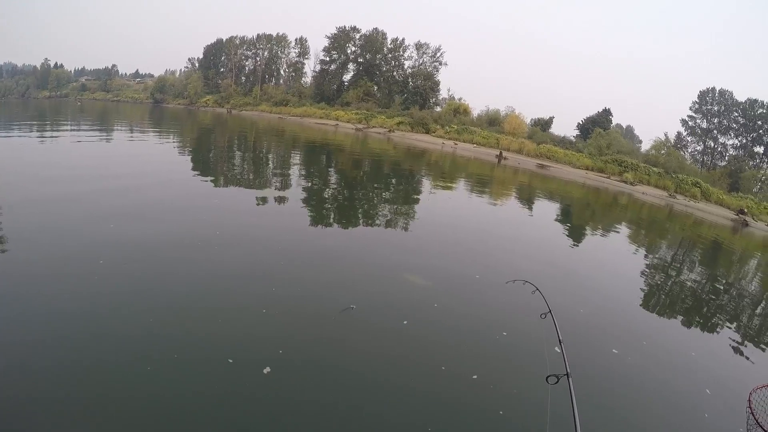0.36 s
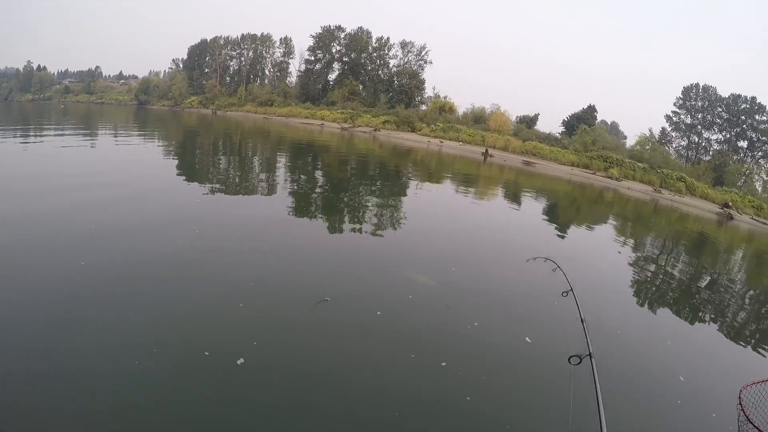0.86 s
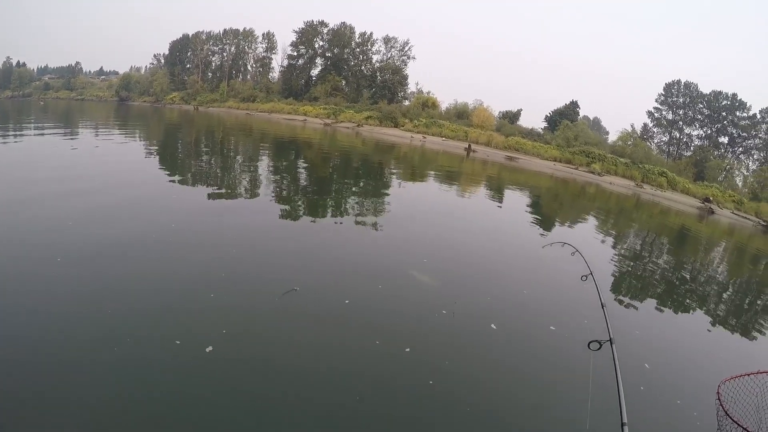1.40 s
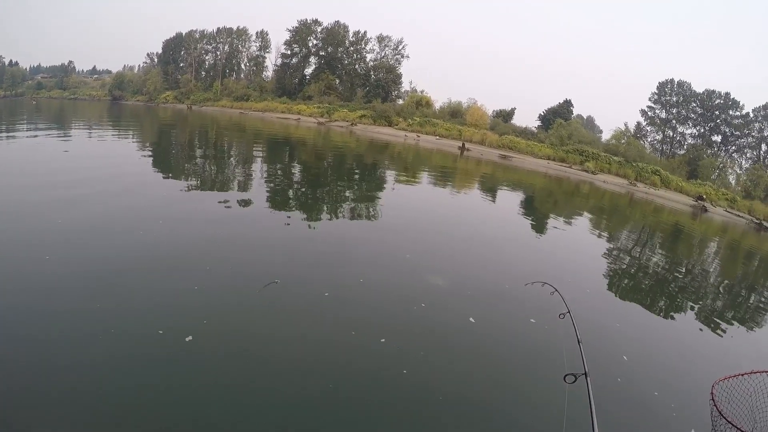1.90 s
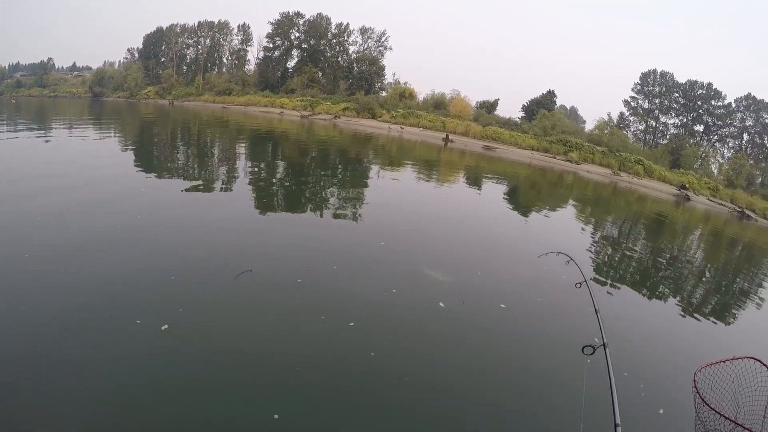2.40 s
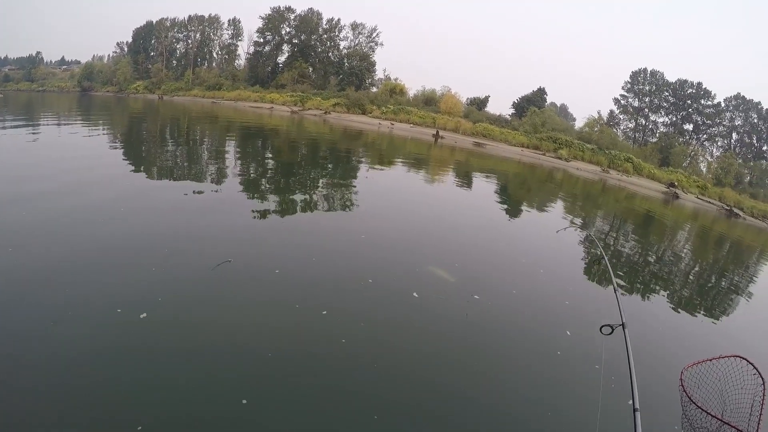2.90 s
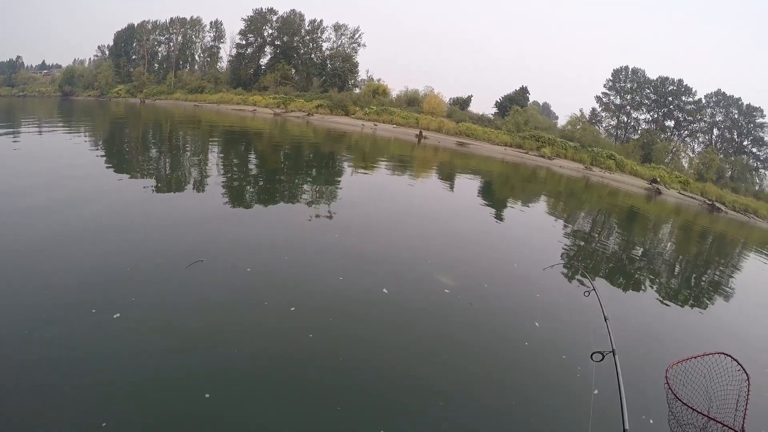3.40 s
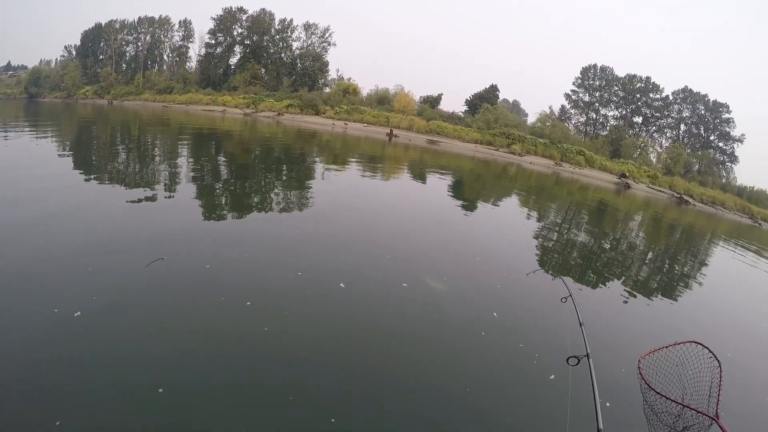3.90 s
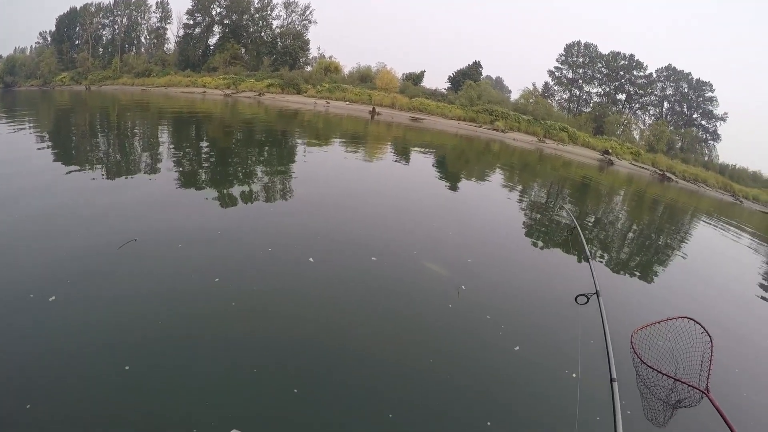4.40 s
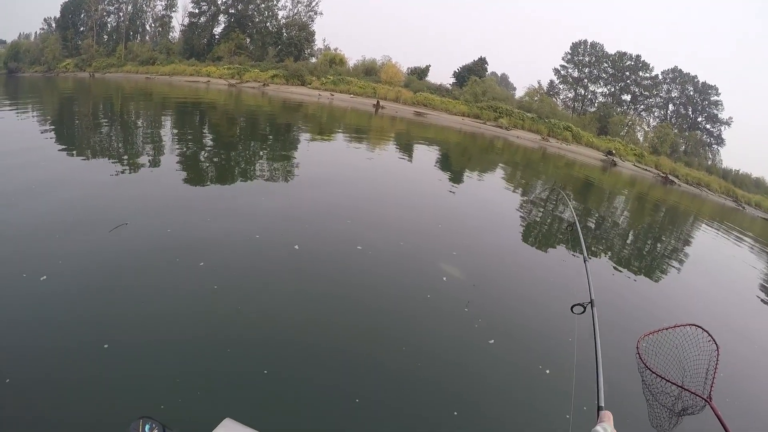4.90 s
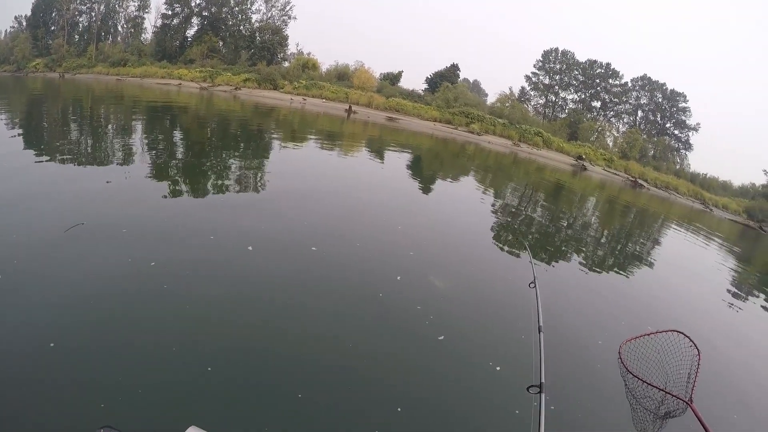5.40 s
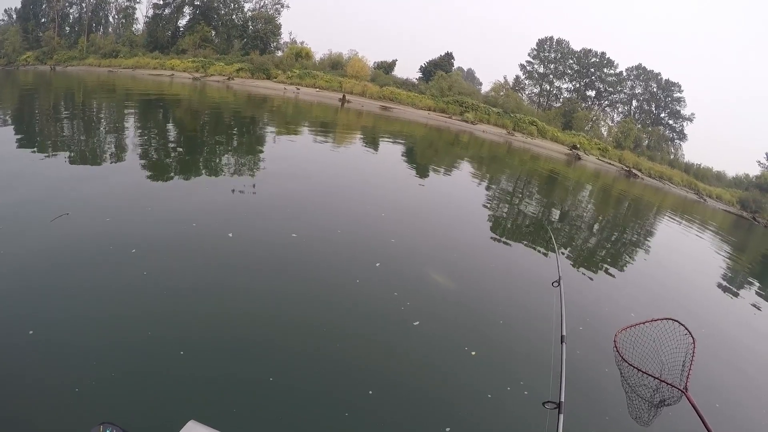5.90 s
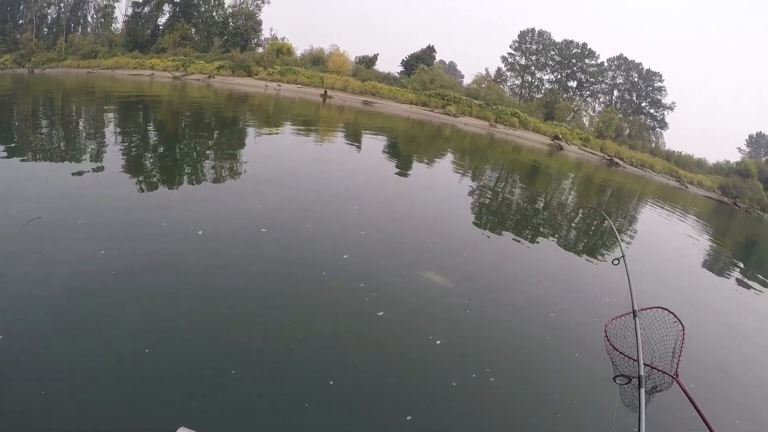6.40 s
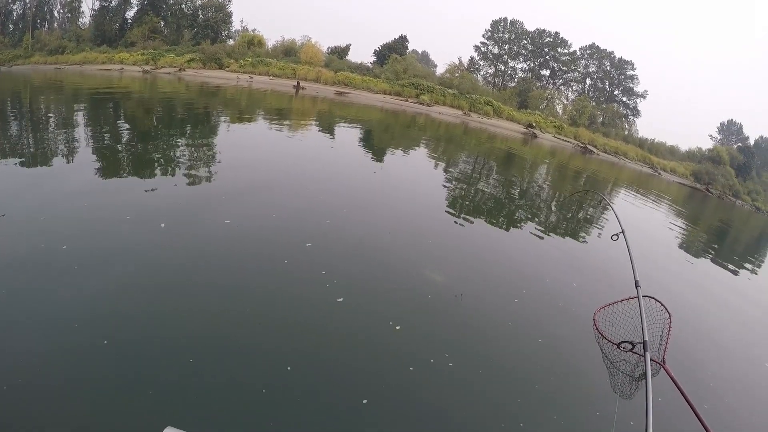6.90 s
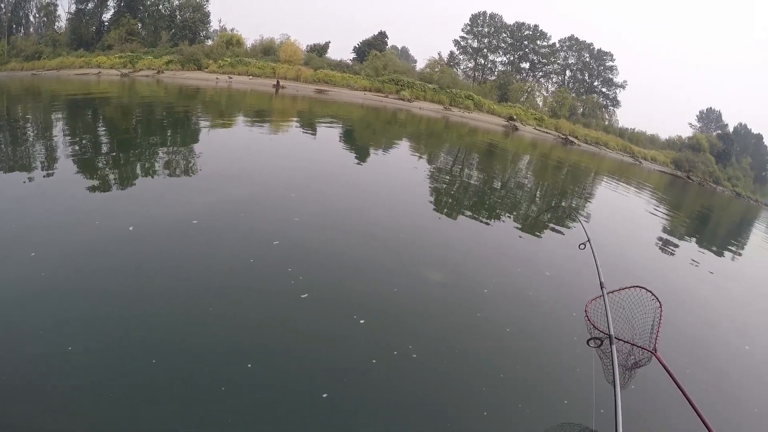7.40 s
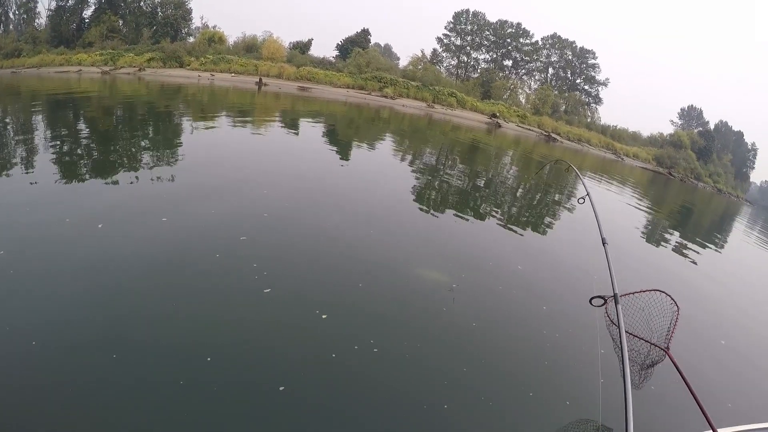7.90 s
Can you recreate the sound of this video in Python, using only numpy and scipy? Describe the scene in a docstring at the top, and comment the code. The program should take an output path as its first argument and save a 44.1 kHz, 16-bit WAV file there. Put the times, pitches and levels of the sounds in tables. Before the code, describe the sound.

A microphone in a small boat picks up a continuous deep motor drone, buzzing softly and drooping gradually in pitch. Low wind noise flutters around it and grows into heavy, irregular thumps after about four and a half seconds. Quiet water hiss, barely audible rustles and low washes fill the background. Very faint high chirps dot the opening and return later; occasional dry ticks and a short clink appear among the gusts.

```python
"""Motor drone over a calm river

A piston motor drones past, sinking in pitch: wavering multiples of the firing rate plus a rush of exhaust gas.
A microphone in a small boat hears it straight and, late and duller, off the water.
Wind noise rumbles, thumps and buffets in growing gusts; faint rustles, low washes and ticks are shaped noise,
a clink is ringing modes. An insect chirps in sine pips over a soft noise hiss and two thin electronic whines."""
import sys
import numpy as np
from scipy import signal
from scipy.fft import rfft, irfft, next_fast_len
from scipy.io import wavfile
from scipy.ndimage import uniform_filter1d

SR = 44100
rng = np.random.default_rng(int(sys.argv[2]) if len(sys.argv) > 2 else 0)


def to_linear_factor(level_db):
    """Convert decibel levels (scalar or array-like) to linear amplitude factors."""
    exponent = np.asarray(level_db, float) / 20
    return 10 ** exponent


def dump(signal):
    """Clip the signal to [-1, 1] and save it as 16-bit WAV at the path in sys.argv[1]."""
    limited = np.clip(np.atleast_2d(signal).T, -1, 1)
    pcm = np.round(limited * 32767).astype(np.int16)
    wavfile.write(sys.argv[1], SR, pcm)


N = 354563
T = np.arange(N) / SR


def level(x, db):
    """Scale to an rms level."""
    return x * to_linear_factor(db) / np.sqrt(np.mean(x ** 2))


def columns(table):
    """Each column after the time column, interpolated sample by sample."""
    s, *rest = np.transpose(table)
    return [np.interp(T, s, c) for c in rest]


def walk(rate_hz):
    """Random levels held 1 / rate_hz and slewed twice; spread near 1."""
    hold = int(SR / rate_hz)
    steps = np.repeat(rng.standard_normal(N // hold + 1), hold)
    return 1.213 * uniform_filter1d(uniform_filter1d(steps, hold), hold)[:N]


def coloured(spectrum):
    """Noise of rms 1 with the given spectrum, joined on a log frequency axis."""
    hz, db = np.transpose(spectrum)
    size = next_fast_len(N)
    f = np.arange(size // 2 + 1) * SR / size + 1  # + 1 keeps the log finite
    gain = to_linear_factor(np.interp(np.log(f), np.log(hz), db, left=-80, right=-80))
    return level(irfft(rfft(rng.standard_normal(size)) * gain, size)[:N], 0)


def band(x, hz, width_hz):
    """Resonant band-pass, gain 1 at the centre."""
    return signal.lfilter(*signal.iirpeak(hz, hz / width_hz, fs=SR), x)


def add(out, s, sound):
    """Mix a short sound in at a time."""
    i = int(s * SR)
    out[i:i + len(sound)] += sound[:N - i]


def swells(table):
    """Summed power of bell-shaped swells; a length spans the 1/e power points."""
    return sum(to_linear_factor(2 * db) * np.exp(-(2 * (T - s) / length_s) ** 2) for s, db, length_s in table)


def motor(firing_hz, second_tone_db, upper_db):
    """Even firings give tones that waver in the moving air, the high ones most; gas puffs once a firing."""
    # Exhaust tones, first to twentieth multiple of the firing rate: relative peak level in dB.
    tones_db = [-5, 3.5, -5, -11.5, -10, -12.5, -23, -21, -23.5, -25, -35, -44, -44, -35.5, -47, -51, -41.5,
                -38, -44, -41]
    # Rush of exhaust gas. Each row: frequency in Hz, relative density in dB.
    gas_spectrum = [(60, -9), (120, -9), (250, -1), (330, 0), (430, -5.5), (620, -14.5), (750, -20),
                    (1000, -30.5), (1600, -34), (3000, -34)]
    gas_db, gas_follows = -10, 0.1  # gas_follows: dB of gas per dB of upper_db
    phase = 2 * np.pi * np.cumsum(firing_hz * (1 + .001 * walk(9))) / SR
    tones = 0
    for k, db in enumerate(tones_db, start=1):
        waver_db = min(.5 + .025 * k * k, 3.2) * walk(6)
        slip_rad = .006 * k * k * walk(7)
        lift_db = second_tone_db * (k == 2) + upper_db * (k >= 7)
        tones = tones + to_linear_factor(db + lift_db + waver_db) * np.cos(k * phase + slip_rad)
    gas = (1 + 0.023 * np.cos(phase)) * coloured(gas_spectrum)
    return tones + to_linear_factor(gas_follows * upper_db) * level(gas, gas_db)


def off_water(x, lag_ms):
    """The bounce is late, duller and turned in phase, so dark bands slide down as the lag grows."""
    share, turn_rad, top_hz = 0.56, 0.9, 1800  # -6 dB at top_hz
    size = next_fast_len(2 * N)
    f = np.arange(size // 2 + 1) * SR / size
    mirrored = np.r_[x, x[::-1]]  # no jump at the ends
    response = np.exp(-1j * turn_rad) / (1 + (f / top_hz) ** 2)
    turned = irfft(rfft(mirrored, size) * response, size)[:N]
    return share * np.interp(T - lag_ms / 1000, T, turned)


def wind_rumble(wind_db):
    """Slow eddies on the microphone, one after another at about the strength of the wind."""
    # Each row: frequency in Hz, relative density in dB before the eddies are evened out.
    rumble_spectrum = [(7.1, -33), (12, 5.5), (27, 1.5), (40, 2.5), (65, 3), (82, -4), (100, -10.5),
                       (130, -20), (170, -43), (290, -120)]
    eddies = coloured(rumble_spectrum)
    power = uniform_filter1d(uniform_filter1d(eddies ** 2, size=2500), size=2500)
    evened = level(eddies / (power + 0.041) ** 0.37, 0)
    return to_linear_factor(wind_db + 2 * walk(16)) * evened  # small eddies come and go by chance


def wind_thumps():
    """Strong eddies swing the membrane a few times; long thumps are deeper."""
    # Each row: centre in seconds, level in dB, length in seconds.
    thump_rows = [(1.008, -34.5, 0.042), (1.157, -39, 0.03), (1.589, -36, 0.052), (1.859, -41, 0.095),
                  (2.449, -37.5, 0.096), (3.549, -42, 0.033), (4.102, -39, 0.048), (4.293, -36, 0.056),
                  (4.629, -30.5, 0.059), (4.812, -26, 0.055), (4.885, -28.5, 0.059), (5.222, -30.5, 0.079),
                  (5.398, -36, 0.045), (5.549, -34, 0.044), (5.665, -34, 0.054), (6.003, -30.5, 0.048),
                  (6.146, -31.5, 0.07), (6.549, -34.5, 0.052), (6.834, -32, 0.044), (7.21, -27, 0.058),
                  (7.319, -37.5, 0.068), (7.428, -23, 0.049), (7.549, -31.5, 0.077), (7.716, -32, 0.082),
                  (7.957, -31.5, 0.053)]
    cycles_per_length = 2.19
    thumps = np.zeros(N)
    for row in thump_rows:
        s, _, length_s = row
        cycles = cycles_per_length * (T - s) / length_s + rng.random()
        thumps += np.sqrt(2 * swells([row])) * np.sin(2 * np.pi * cycles)
    return thumps


def wind_buffeting(wind_db):
    """Turbulence shakes the housing above the rumble, with the wind and in separate gusts."""
    # Gusts that buffet the housing. Each row: centre in seconds, peak level in dB, length in seconds.
    gust_rows = [(.9, -51.5, 1), (3.7, -64, 0.45), (4.75, -47.5, 0.39), (5.5, -41, 0.33), (6.0, -42, 0.7),
                 (6.85, -45.5, 0.39), (7.25, -41, 0.16), (7.45, -40.5, 0.26), (7.68, -42.5, 0.21),
                 (7.9, -57, 0.26)]
    # Each row: frequency in Hz, relative density in dB.
    buffet_spectrum = [(60, -46), (90, -0.5), (150, -4.5), (230, -13), (300, -18), (600, -41.5)]
    buffet_db, follows = -53, 1  # level in a wind of -40 dB; dB gained per dB of wind
    steady = to_linear_factor(buffet_db + follows * (wind_db + 40))
    shake = np.sqrt(steady ** 2 + swells(gust_rows))
    return shake * to_linear_factor(1.94 * walk(14)) * coloured(buffet_spectrum)


def wind():
    """Rumble, thumps and buffeting of air on the microphone."""
    # Each row: time in seconds, wind strength as rumble level in dB.
    wind_curve = [(0, -38.5), (.6, -43), (1.3, -41.5), (2, -38.5), (2.8, -39.5), (4.2, -39), (4.9, -37),
                  (5.7, -36), (6.35, -40.5), (6.9, -34), (7.6, -30), (8.04, -34.5)]
    wind_db, = columns(wind_curve)
    return wind_rumble(wind_db) + wind_thumps() + wind_buffeting(wind_db)


def rustles():
    """Faint rustles and longer low washes: grainy noise, band-passed twice and faded at both ends."""
    # Each row: start in seconds, length in seconds, centre in Hz, width of each pass in Hz,
    # rms level in dB before the fades.
    rustle_rows = [(0.087, 0.39, 4400, 430, -78), (0.104, 0.38, 5500, 700, -77),
                   (0.088, 0.4, 6540, 760, -76.5), (0.44, 0.25, 1600, 350, -73),
                   (0.62, 0.42, 2060, 710, -71.5), (3.2, 1.23, 951, 290, -72), (1.202, 1.34, 830, 590, -71),
                   (1.3, 0.23, 1548, 840, -68), (1.678, 0.478, 4960, 1800, -74.5),
                   (2.18, 0.57, 1970, 1200, -68), (2.884, 0.47, 5200, 1500, -75),
                   (3.445, 0.37, 2000, 1680, -66.5), (3.93, 0.39, 2000, 1300, -66.5),
                   (6.3, 1.7, 850, 400, -69.5), (3.995, 0.39, 4700, 2120, -73),
                   (4.38, 1.05, 2000, 2130, -71), (4.2, 1.9, 609, 79, -68), (.4, 1.1, 1200, 580, -71.5),
                   (7.302, 0.96, 1530, 600, -69.5), (4.93, 0.26, 5100, 2020, -71),
                   (5.594, 0.18, 1800, 1498, -65.5), (6.204, 0.633, 2200, 1800, -68.5),
                   (6.249, 0.6, 5300, 2140, -73.5)]
    out = np.zeros(N)
    for s, length_s, hz, width_hz, db in rustle_rows:
        n = int(length_s * SR)
        grain = rng.standard_normal(n) * to_linear_factor(2.4 * walk(88.9)[:n])
        rustle = band(band(grain, hz, width_hz), hz, width_hz)
        add(out, s, signal.windows.tukey(n, .55) * level(rustle, db))
    return out


def ticks():
    """Dry contacts of tackle: a snap and a short decaying scrape, band-passed twice."""
    # Each row: start in seconds, peak level in dB, centre in Hz, width of each pass in Hz.
    tick_rows = [(1.678, -54, 4700, 2000), (2.540, -55, 4400, 900), (2.878, -56, 4580, 2000),
                 (4.012, -55, 4988, 2500), (4.735, -50.5, 5200, 2400), (4.735, -53, 2900, 900),
                 (4.742, -50, 2600, 1200), (4.743, -55, 5000, 3500), (5.282, -56, 6600, 1800),
                 (6.566, -57, 6400, 2000), (7.095, -58, 2698, 450), (7.529, -53, 6000, 6998),
                 (7.718, -53.5, 2602, 450)]
    snap, decay_s = 2.4, 0.0028  # snap: first contact against the scrape after it
    out, t = np.zeros(N), T[:SR // 4]
    for s, db, hz, width_hz in tick_rows:
        contact = (t == 0) * snap + rng.standard_normal(len(t))
        tick = band(band(contact * np.exp(-t / decay_s), hz, width_hz), hz, width_hz)
        add(out, s, to_linear_factor(db) * tick / np.abs(tick).max())
    return out


def clink():
    """A small metal part strikes and bounces, ringing in decaying modes."""
    # Each row: start in seconds, gain of the ring in dB.
    strikes = [(7.5288, -51.5), (7.540, -62)]
    # Each row: mode frequency in Hz, relative level in dB, 60 dB decay time in seconds.
    modes = [(5330, 2.5, 0.02), (5700, 1, 0.015), (7500, -12.5, 0.12), (7950, -13, .02), (9890, -18, .06),
             (12370, -16, .12)]
    out, t = np.zeros(N), T[:SR // 4]
    ring = sum(to_linear_factor(db) * np.sin(2 * np.pi * hz * t) * 1000 ** (-t / t60_s) for hz, db, t60_s in modes)
    for s, db in strikes:
        add(out, s, to_linear_factor(db) * ring)
    return out


def insect():
    """Short whistled pips: sines under a bell window, each slightly off in pitch."""
    # Each row: start in seconds, peak level in dB.
    chirp_rows = [(0.1705, -66), (0.7043, -73), (0.7856, -68), (0.8205, -71), (0.9782, -69), (1.0196, -68),
                  (1.1912, -70), (1.3586, -67), (1.4726, -71), (1.5948, -71), (1.7522, -72), (1.918, -71),
                  (2.0193, -71), (2.1715, -69), (2.3191, -71), (5.8394, -74), (5.9844, -71), (6.0566, -71),
                  (6.1699, -71), (6.2266, -71), (6.3599, -72), (6.4807, -73), (6.5899, -72), (6.7458, -70),
                  (6.9234, -77), (7.0383, -72), (7.95, -76), (8.0141, -71)]
    length_s, centre_hz, spread_hz = 0.022, 8500, 30
    out, t = np.zeros(N), T[:int(length_s * SR)]
    for s, db in chirp_rows:
        hz = centre_hz + spread_hz * rng.standard_normal()
        add(out, s, to_linear_factor(db) * np.hanning(len(t)) * np.sin(2 * np.pi * hz * t))
    return out


def water_hiss():
    """Water and bank hiss slowly rises; narrow bands of it below about 3 kHz waver at random."""
    # Each row: frequency in Hz, relative density in dB.
    hiss_spectrum = [(410, -23), (700, -1.5), (990, 1), (1310, -5), (1610, -4), (2310, -8), (2660, -9),
                     (3400, -14), (4560, -13.5), (7820, -19.5), (9860, -20.5), (13600, -24.5), (15100, -26)]
    start_db, rise_db_per_s = -61.5, 0.14
    hiss = coloured(hiss_spectrum)
    wavering = 0
    for hz in 700 * 1.06 ** np.arange(26):
        wavering = wavering + (to_linear_factor(2.63 * walk(6)) - 1) * band(hiss, hz, hz / 32)
    return to_linear_factor(start_db + rise_db_per_s * T + 0.09 * walk(0.69)) * (hiss + wavering)


def whines():
    """Camera electronics: thin sines wavering in level and phase."""
    # Each row: frequency in Hz, rms level in dB about which it wavers.
    whine_rows = [(9771, -95), (12225, -99)]
    out = np.zeros(N)
    for hz, db in whine_rows:
        waver = np.sqrt(2) * to_linear_factor(db + 4.4 * walk(4.5))
        out += waver * np.sin(2 * np.pi * hz * T + 0.73 * walk(6))
    return out


def scene():
    """Everything reaches one microphone."""
    # Motor as heard. Each row: time in seconds, firing rate in Hz, gain in dB,
    # lift in dB of the upper tones that the moving air lets through,
    # lift in dB of the second tone, uneven but stronger later on, delay in ms of the path off the water.
    motor_curves = [(0, 56.4, -44, -8.5, -10, 3.7), (.5, 55.63, -43, -6, -11, 3.9),
                    (1, 55.17, -44.5, 2.5, -2.5, 3.88), (1.55, 54.97, -42.5, -1.5, -1.5, 4.08),
                    (2, 54.5, -41, -4.5, -8, 4.04), (2.8, 53.72, -43, -7.5, -2.5, 4),
                    (3.3, 53.69, -43.5, 3.5, -1.5, 4.36), (4.2, 53.23, -42.5, 1, -1, 4.44),
                    (5, 53.3, -43, 1, 2, 4.57), (5.6, 53.03, -43, 1.5, -1, 4.63),
                    (6.2, 52.5, -42.5, 0.5, 3.5, 4.9), (6.9, 52.1, -41.5, 2, -0.5, 5),
                    (7.5, 51.57, -43, 4, 1, 5.3), (8.04, 51.31, -42, -3, 3, 5.26)]
    firing_hz, gain_db, upper_db, second_tone_db, lag_ms = columns(motor_curves)
    drone = to_linear_factor(gain_db) * motor(firing_hz, second_tone_db, upper_db)
    small_sounds = rustles() + ticks() + clink()
    background = water_hiss() + whines()
    return (drone + off_water(drone, lag_ms) + wind() + small_sounds + insect() + background)[None]


def low_pass(x):
    """Removes everything above the highest recorded frequency."""
    return signal.sosfilt(signal.butter(12, 15210, fs=SR, output="sos"), x)


def record(dry):
    """The finished mix as it is stored."""
    return low_pass(dry)


dry = scene()
out = record(dry)
dump(out)
```